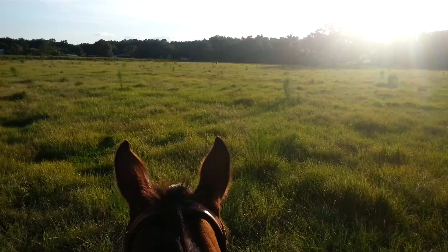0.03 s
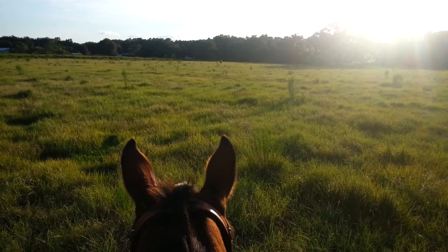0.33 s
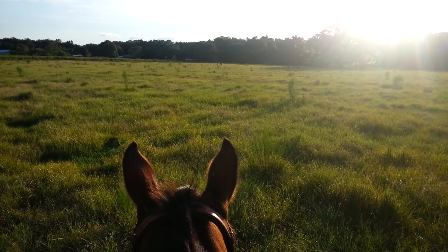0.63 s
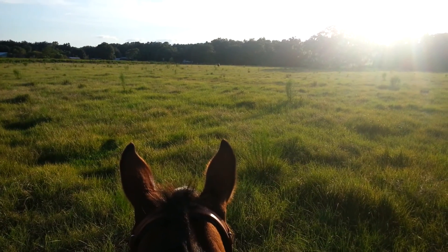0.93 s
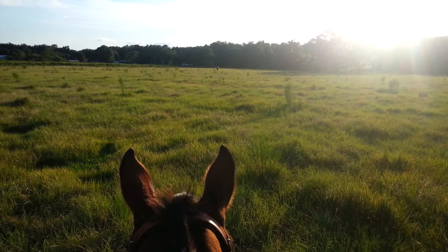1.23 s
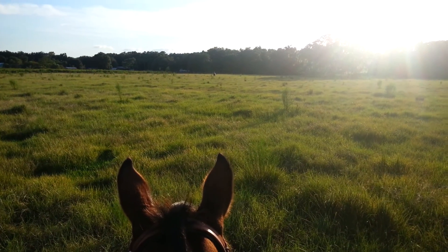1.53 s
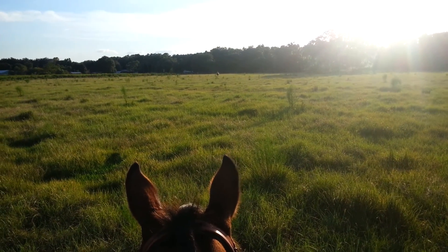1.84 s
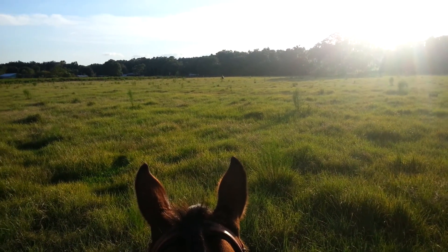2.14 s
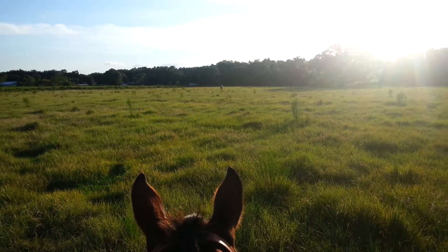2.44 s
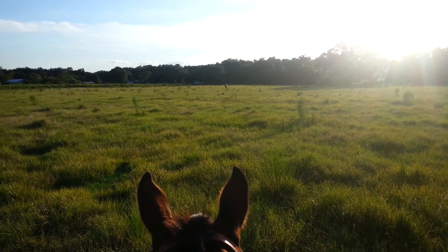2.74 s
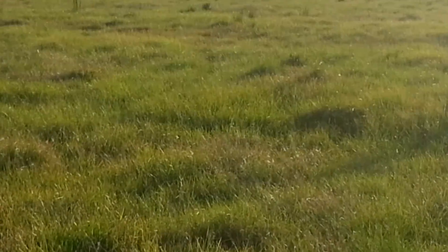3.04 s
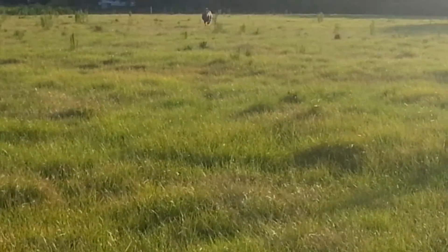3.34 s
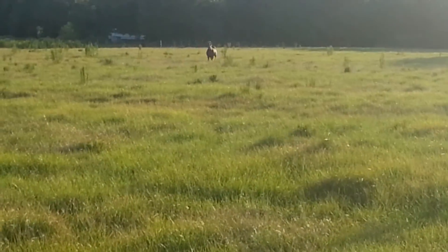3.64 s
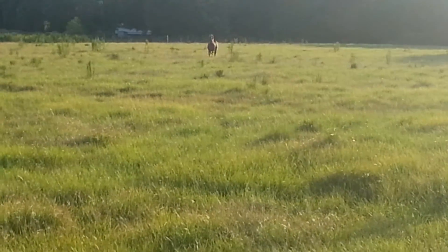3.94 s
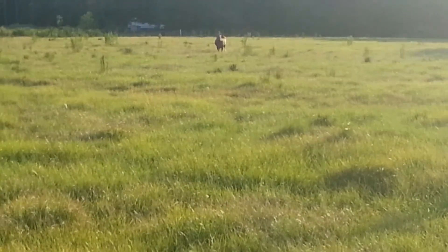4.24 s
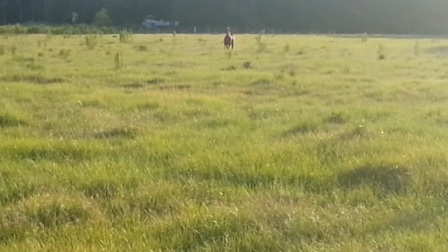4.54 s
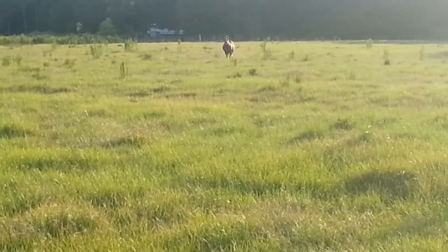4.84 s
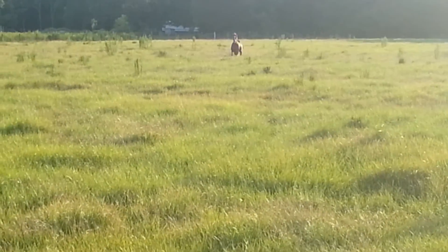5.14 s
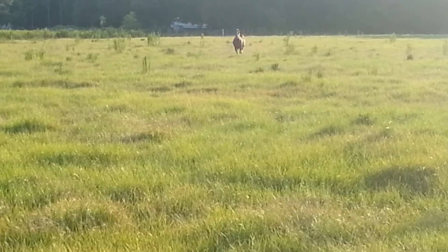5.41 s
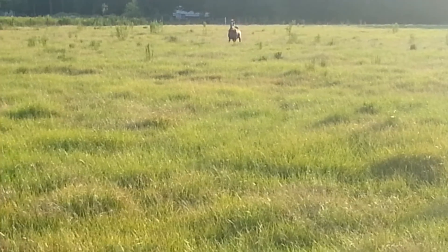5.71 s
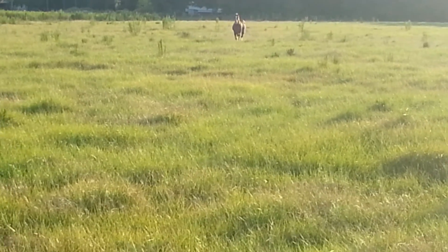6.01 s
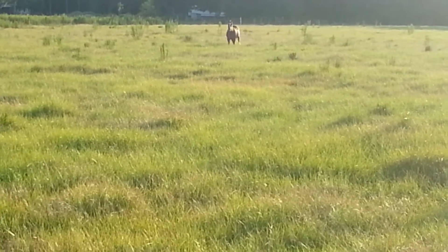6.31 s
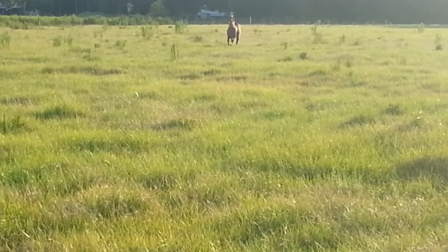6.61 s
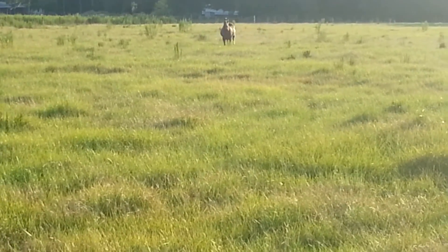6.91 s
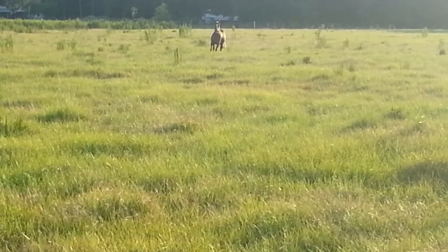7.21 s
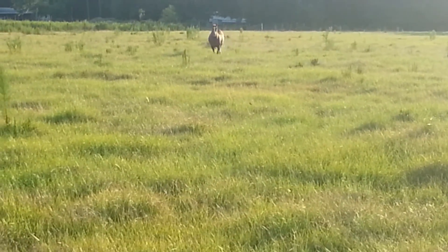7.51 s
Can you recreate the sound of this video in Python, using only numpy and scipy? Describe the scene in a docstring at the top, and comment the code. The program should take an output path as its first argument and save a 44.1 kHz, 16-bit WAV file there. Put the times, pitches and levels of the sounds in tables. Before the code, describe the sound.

A far-off propeller plane hums with a soft pulse while high insect hiss and gentle wind fill a grassy field. Then a horse calls from across the field, starting with a thin, high squeal and wavering down into a rasp. Brief low wind bumps and a few light knocks on the microphone follow, mostly on the right, leaving the quiet outdoor background.

```python
"""In an open pasture, insects trill in the grass and a light breeze blows. Two propellers, probably
a distant plane, turn at slightly different speeds, so their drone throbs. A horse far off whinnies:
a rising squeal breaks into shakes that sink and turn hoarse as its breath runs out. Near the end,
a few puffs of wind and handling ticks reach the right side of the rider's camera."""
import sys
import numpy as np
from scipy import signal
from scipy.fft import rfft, irfft
from scipy.io import wavfile
from scipy.ndimage import uniform_filter1d

SR = 44100
rng = np.random.default_rng(int(sys.argv[2]) if len(sys.argv) > 2 else 0)


def waveform_to_disk(signal):
    """Save audio, clipped to [-1, 1], as 16-bit WAV at the path in sys.argv[1]."""
    frames = np.transpose(np.atleast_2d(signal))
    scaled = np.clip(frames, -1, 1) * 32767
    samples = np.round(scaled).astype(np.int16)
    wavfile.write(sys.argv[1], SR, samples)


N = 333396
T = np.arange(N) / SR

# The plane's notes. Each row: time in seconds, blade pitch in Hz, octave in dB, engine note in dB.
PLANE_NOTES = [(.78, 130.3, -51, -43.5), (1.3, 131.5, -52, -42.5), (2, 131.5, -48.5, -42.5),
               (2.8, 130.7, -50.5, -52.5), (3.7, 129.2, -58.5, -58), (4.6, 127.9, -58.5, -79),
               (6, 128.2, -57, -56), (7.56, 126.8, -58, -51)]
# The throb quickens as the propellers drift apart. Each row: time in seconds, beats a second.
BEAT_RATE = [(.8, 3.36), (5.95, 3.79), (6.27, 5.05), (6.55, 3.75)]
# The drone fades and returns with distance. Each row: time in seconds, relative level in dB.
DRONE_LEVEL = [(.95, -38.7), (1.85, -35.3), (2.8, -35.7), (3.4, -40.7), (5.05, -37.3), (6.05, -41.3),
               (7.5, -42.2)]
# The tone of the open air. Each row: frequency in Hz, relative level in dB.
AIR_TONE = [(20, 2), (45, -13), (80, -4), (150, 10.5), (210, 3), (300, -0.5), (420, -6), (600, -6),
            (1100, -9), (2000, -12), (2700, -14.5), (4200, -14.5), (6200, -28), (14500, -25)]
# How alike the air sounds on both sides. Each row: frequency in Hz, likeness (1 is the same).
AIR_LIKENESS = [(60, 0.18), (130, .95), (280, 0.86), (620, 0.32), (1350, 0.17), (3000, -0.21),
                (14000, 0.16)]
# Which side the air is louder on. Each row: frequency in Hz, left minus right in dB.
AIR_BALANCE = [(60, -12), (200, 1.2), (700, -1.5), (1300, 2.5), (2400, 5), (4300, -1.5), (6200, -4.5),
               (14000, -3)]
# The breeze lifts the air above the bass. Each row: time in seconds, lift in dB.
BREEZE = [(.78, .5), (1.6, 2.5), (2.6, 3.5), (3.1, .5), (3.8, -.5), (5.4, 2), (6.4, -0.5), (7.56, -.5)]
# A faint hiss that swells once. Each row: time in seconds, level in dB.
HISS_LEVEL = [(.78, -74), (2.2, -67), (2.6, -55.5), (2.9, -65), (3.5, -89), (7.56, -75)]
# Insect choirs. Each row: pitch in Hz, width in Hz, left level in dB, right level in dB,
# wing strokes a second, pulsing from 0 to 1.
CHOIRS = [(10170, 410, -56.5, -64.5, 78, 0.3), (10580, 620, -56.5, -66, 70, 0.15),
          (9620, 1400, -57, -66, 120, 0.08), (8580, 310, -62, -76, 71.3, 0.04),
          (7730, 880, -65.5, -73, 27, 0.45)]
# The horse's opening squeal. Each row: time in seconds, pitch in Hz, relative level in dB.
SQUEAL = [(3.725, 1525, -56.5), (3.81, 1690, -54.5), (3.91, 1762, -49), (4.01, 1787, -49),
          (4.095, 1822, -45)]
# The shaking neigh. Each row: time in seconds, top pitch in Hz, relative squeal level in dB, rasp
# level in dB, roughness from 0 to 1, depth of the breaks in dB, brightness in dB per harmonic.
NEIGH = [(4.13, 1905, -41.7, -56, .03, 3, 1.5), (4.29, 1918, -43.5, -51, .09, 5, -.5),
         (4.41, 1848, -45.7, -49.3, .11, 1, -1), (4.57, 1822, -42.7, -49, .13, 15, 1.5),
         (4.86, 1838, -44.7, -47.7, .21, 6, 0), (5.06, 1800, -48.7, -46.3, .38, 8, 4),
         (5.22, 1762, -46, -48.7, .44, 7, -2.5), (5.45, 1692, -55, -49, .42, 10, 0),
         (5.56, 1590, -58, -52.5, .85, 20, 0), (5.66, 1525, -56.5, -59, .8, 29, -6)]
# The shakes slow as the breath runs out. Each row: time in seconds, shakes a second.
SHAKE_RATE = [(4.37, 11.5), (4.43, 10.5), (5.41, 10.55), (5.48, 9.5)]
# The throat as heard across the field. Each row: frequency in Hz, gain in dB.
THROAT_TONE = [(900, -32), (1500, -22), (1850, -12), (2500, -14), (3100, -1), (3600, -1.5), (4300, -6.5),
               (4800, -13), (5400, -11), (5800, -24), (6500, -36), (9000, -42)]
# The tone of the hoarse rasp. Each row: frequency in Hz, relative level in dB.
RASP_TONE = [(600, -35), (1250, -9), (1750, -3.5), (2250, 4), (2450, 3), (2650, -5), (2950, 1.5),
             (3600, -3), (4250, -1.5), (4750, -14.5), (5400, 0.5), (6000, -11.5), (7000, -36)]
# The camera body bends the call differently to each side. Each row: frequency in Hz,
# how far the left leads in radians, left minus right in dB.
BODY_BENDING = [(1854, -1.8, -4), (2160, -1.5, 5), (2420, -2, -3), (3000, 1.3, -10), (3180, 0.6, -12),
                (3430, 2, -5.5), (3570, 1, 3.5), (3647, 0, -1), (3990, 2.5, -13), (4100, -0.5, -2),
                (5060, 0, -7), (5200, 1.7, 0), (5300, 0.1, 3.5), (5630, 0.86, -1)]
# Wind puffs. Each row: middle in seconds, level in dB, rise and fall time in seconds.
PUFFS = [(5.421, -36.5, 0.022), (5.47, -35, 0.016), (5.525, -38, .015), (5.553, -39, 0.011),
         (5.831, -36, 0.013), (5.878, -33, 0.02), (5.912, -42, .012), (7.517, -44, .015)]
# Bumps on the camera. Each row: start in seconds, thud strength in dB, pitch in Hz,
# ring time in seconds, snap level in dB.
KNOCKS = [(5.4811, -17.5, 158, 0.0026, -60), (5.848, -26.5, 139, 0.0026, -65),
          (5.933, -22.5, 136.5, 0.0057, -40), (5.9468, -23, 557, 0.0015, -32),
          (5.9732, -21, 150, 0.0028, -58), (6.123, -38.5, 500, 0.0019, -42),
          (6.2744, -24.5, 517, 0.00095, -39)]
# The tone of a bump's snap. Each row: frequency in Hz, relative level in dB.
SNAP_TONE = [(300, -4), (1400, -10), (2200, 1), (4000, -11), (8000, -8), (14000, -24)]


def amp(db):
    """Turns decibels into a gain."""
    return 10 ** (np.asarray(db) / 20)


def evened(x):
    """Scales a sound to an average (rms) level of 1."""
    return x / np.sqrt(np.mean(abs(x) ** 2) + 1e-20)


def look_up(table, hz):
    """Reads between the rows of a frequency table, on a log scale."""
    row_hz, value = np.transpose(table)
    return np.interp(np.log(hz + 1), np.log(row_hz + 1), value)


def curves(table):
    """Turns the columns of a time table into one value per sample."""
    times, *columns = np.transpose(table)
    return [np.interp(T, times, column) for column in columns]


def colour(x, tone):
    """Filters a sound by a tone table."""
    return irfft(rfft(x) * amp(look_up(tone, np.fft.rfftfreq(N, 1 / SR))), N)


def band(centre_hz, width_hz):
    """Noise in one bell-shaped band; centred on zero, it is a random wander."""
    hz = np.fft.rfftfreq(N, 1 / SR)
    bell = np.exp(-((hz - centre_hz) / width_hz) ** 2 * 2 * np.log(2))
    return evened(irfft(rfft(rng.standard_normal(N)) * bell, N))


def angle(hz):
    """Adds up a changing frequency into a wave's phase."""
    return 2 * np.pi * np.cumsum(hz) / SR


def cycles(rates, since_s):
    """Counts cycles from a given moment, at the pace of a rate table."""
    count = np.cumsum(curves(rates)[0]) / SR
    return count - np.interp(since_s, T, count)


def plane(second_gain=.73, boost_db=1, engine_octave_db=-64, left_lag_s=.00013):
    """Two propellers a few Hz apart swell and cancel in turn; the air on the way makes them waver."""
    hz, octave_db, engine_db = curves(PLANE_NOTES)
    beat = 2 * np.pi * cycles(BEAT_RATE, since_s=.805)
    phase = angle(hz + .3 * band(0, 4.05))
    blades = np.cos(phase + beat / 2) - second_gain * np.cos(phase - beat / 2)
    blades *= amp(curves(DRONE_LEVEL)[0] + boost_db + band(0, 14))
    octave = np.cos(2 * phase + beat / 2) + .32 * np.cos(2 * phase - beat)
    octave *= amp(octave_db + 1.56 * band(0, 7.2))
    firing = phase * 1.318 + .5 * band(0, 10.6)
    engine = np.cos(firing) * amp(engine_db + 2 * band(0, 2.9))
    engine += np.cos(2 * firing) * amp(engine_octave_db)
    drone = blades + octave + engine
    return np.array([np.interp(T - left_lag_s, T, drone), drone])  # the plane is on the right


def open_air(level_db=-47.5, patchy_db=1.24, breeze_from_hz=120, breeze_to_hz=6000):
    """Light wind over grass and far rumble: alike on both sides in the low hum, unlike in the treble."""
    frames, hz = N // 256 + 5, np.fft.rfftfreq(1024, 1 / SR)
    a, b, c, d, patches = rng.standard_normal((frames, 513, 5)).T
    patches = uniform_filter1d(patches, size=12, axis=0)  # smooth across pitch
    patches = evened(uniform_filter1d(patches, size=16, axis=1))  # then across time
    likeness = np.clip(look_up(AIR_LIKENESS, hz), -1, 1)[:, None]
    left = a + 1j * b
    right = likeness * left + np.sqrt(1 - likeness ** 2) * (c + 1j * d)
    lean = amp(look_up(AIR_BALANCE, hz) / 2)[:, None]
    spectrum = np.array([left * lean, right / lean])
    breeze_db = np.interp(np.linspace(0, T[-1], frames), *np.transpose(BREEZE))
    mids = hz ** 2 / (hz ** 2 + breeze_from_hz ** 2) / (1 + (hz / breeze_to_hz) ** 2)
    spectrum *= amp(look_up(AIR_TONE, hz)[:, None] + patchy_db * patches + np.outer(mids, breeze_db))
    return amp(level_db) * evened(signal.istft(spectrum, nperseg=1024, noverlap=768)[1][:, :N])


def faint_hiss(hz=1990, width_hz=230):
    """A narrow band of hiss, all around, swells once."""
    return np.array([band(hz, width_hz) for side in range(2)]) * amp(curves(HISS_LEVEL)[0])


def insects():
    """Each choir is a narrow band of hiss chopped by wing strokes."""
    out = np.zeros((2, N))
    for hz, width, left_db, right_db, strokes, pulsing in CHOIRS:
        for side, db in enumerate((left_db, right_db)):
            wings = 1 + pulsing * np.cos(angle(strokes * (1 + .0126 * band(0, 2.5))))
            out[side] += amp(db + .5 * band(0, 2.4)) * evened(band(hz, width) * wings)
    return out


def cricket(hz=7850, sag_hz=220, strokes_per_s=31.2, left_db=-70, right_db=-82):
    """One cricket on the left: every wing stroke is a short tone that sags in pitch."""
    stroke = angle(strokes_per_s * (1 + .012 * band(0, 2))) / (2 * np.pi) % 1
    tone = np.cos(angle(hz - sag_hz * stroke + 60 * band(0, 216)))
    pulse = np.sin(np.pi * np.minimum(stroke / .61, 1))
    return evened(tone * pulse * amp(2 * band(0, 12))) * amp([[left_db], [right_db]])


def squeal(hz, bright_db):
    """The horse's high voice: four harmonics shaped by its throat."""
    phase = angle(hz)
    return np.sqrt(2) * sum(amp(look_up(THROAT_TONE, k * hz) + (k - 2) * bright_db) * np.cos(k * phase)
                            for k in range(1, 5))


def rasp(hz, rough, uneven_db=-9):
    """The low voice: vocal folds buzz at a third of the squeal's pitch and chop the breath."""
    phase = angle(hz) / 3 + angle(hz / 3 * .014 * band(0, 200))
    folds = sum(np.cos(k * phase + rng.uniform(0, 2 * np.pi)) * amp(2 * band(0, 60))
                for k in range(2, 12) if k % 3)
    # unequal cycles add tones halfway between the harmonics
    uneven = sum(np.cos((k + .5) * phase + rng.uniform(0, 2 * np.pi)) * band(0, 50)
                 for k in range(2, 10))
    breath = rng.standard_normal(N) * (1 + .7 * np.cos(phase))
    buzz = evened(colour(evened(folds) + amp(uneven_db) * evened(uneven), RASP_TONE))
    return evened(buzz + (.5 + 1.2 * rough ** 4) * evened(colour(breath, RASP_TONE)))


def whinny(attack_db_per_s=1200, release_db_per_s=170, catch_s=3.813):
    """Two voices in one throat: a squeal rises, catches once, then shakes and gives way to a rasp."""
    opening = [(s, hz, db, db - 17, .03, 0, 1.5) for s, hz, db in SQUEAL]  # clean, hardly any rasp
    hz, squeal_db, rasp_db, rough, break_db, bright_db = curves([*opening, *NEIGH])
    shake = np.maximum(cycles(SHAKE_RATE, since_s=4.14), -.5)
    shaking = np.clip(2 * shake + 1, 0, 1)
    # each shake scoops up slowly, falls faster, and the squeal breaks off in the fall
    dip = np.sin(np.pi * (shake + .12 * np.sin(np.pi * shake) ** 2)) ** 2 * shaking
    broken = np.exp(-(np.sin(np.pi * (shake - .39)) / .58) ** 2) * shaking
    jitter = 1 + .024 * rough * band(0, 260)
    hz = hz * (1 - .07 * dip * (.8 + rough)) * jitter
    high = squeal(hz, bright_db) * amp(squeal_db - break_db * broken + 5.5 * rough * band(0, 158.3))
    rasp_dip_db = .24 * (break_db + 14) * np.sin(np.pi * (shake - .12)) ** 2  # dips after the squeal
    low = rasp(hz, rough) * amp(rasp_db - rasp_dip_db)
    fade_db = attack_db_per_s * np.maximum(SQUEAL[0][0] - T, 0)
    fade_db += release_db_per_s * np.maximum(T - NEIGH[-1][0], 0)
    catch_db = 15 * np.exp(-((T - catch_s) / .016) ** 2)
    return (high + low) * amp(-fade_db - catch_db)


def across_field(call, echo_db=-13, echo_s=.35, echoes_per_s=2000):
    """The call comes from ahead and bends around the camera; grass and trees scatter a faint echo."""
    t, hz = T[:SR], np.fft.rfftfreq(N, 1 / SR)
    echoes = rng.standard_normal((2, SR)) * (rng.random((2, SR)) < echoes_per_s / SR)
    echoes *= amp(-60 * t / echo_s) * (t > .006)
    tail = signal.fftconvolve(call[None], echoes / np.linalg.norm(echoes[0]), axes=1)[:, :N]
    row_hz, lead, lean_db = np.transpose(BODY_BENDING)
    bend = amp(np.interp(hz, row_hz, lean_db) / 2) * np.exp(.5j * np.interp(hz, row_hz, lead))
    return irfft(rfft(call) * np.array([bend, 1 / bend]), N) + amp(echo_db) * tail


def wind_puffs():
    """Wind hits the microphone in short, low bursts."""
    return band(151, 146) * sum(amp(db) * np.exp(-((T - s) / width) ** 2) for s, db, width in PUFFS)


def handling_knocks(snap_s=.00071, shell_hz=2200, shell_s=.0027, shell_db=-3):
    """Each bump on the camera is a dull thud and a snap that briefly rings its shell."""
    out, snaps = np.zeros((2, N))
    for start, db, hz, ring_s, snap_db in KNOCKS:
        age = np.maximum(T - start, 0)
        out -= amp(db) * age / ring_s * np.exp(1 - age / ring_s) * np.sin(2 * np.pi * hz * age)
        out += amp(snap_db + shell_db) * np.exp(-age / shell_s) * np.sin(2 * np.pi * shell_hz * age)
        snaps += amp(snap_db) * np.exp(-age / snap_s) * (T > start)
    return out + snaps * evened(colour(rng.standard_normal(N), SNAP_TONE))


def scene():
    """The pasture as heard from the saddle."""
    horse = across_field(whinny())
    background = plane() + open_air() + faint_hiss() + insects() + cricket()
    camera = (wind_puffs() + handling_knocks()) * amp([[-20], [0]])  # mostly on the right
    return background + horse + camera


def record(dry, low_cut_hz=50, high_cut_hz=14560, start_s=.778):
    """The microphone loses deep bass and the highest treble; the sound starts after a short silence."""
    hz = np.fft.rfftfreq(N, 1 / SR)
    thinned = irfft(rfft(dry) * hz ** 4 / np.hypot(hz ** 4, low_cut_hz ** 4), N)
    low_pass = signal.firwin(511, high_cut_hz, window=("kaiser", 9), fs=SR)
    return signal.oaconvolve(thinned * (T >= start_s), low_pass[None], "same")


dry = scene()
out = record(dry)
waveform_to_disk(out)
```